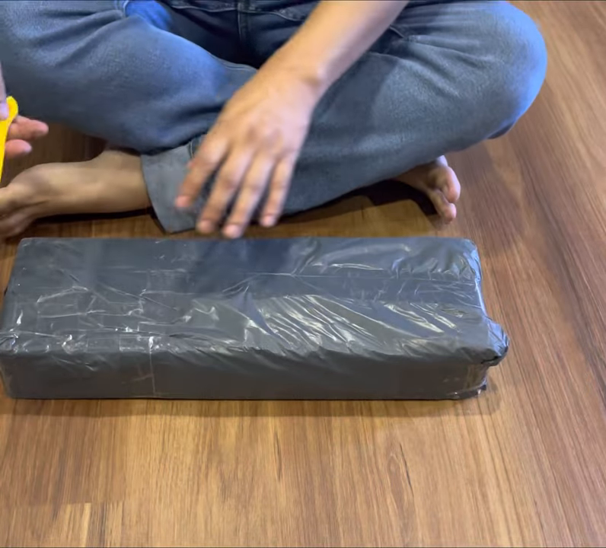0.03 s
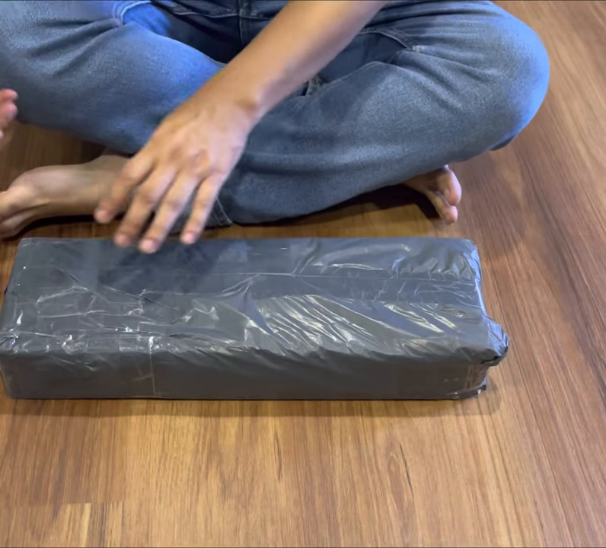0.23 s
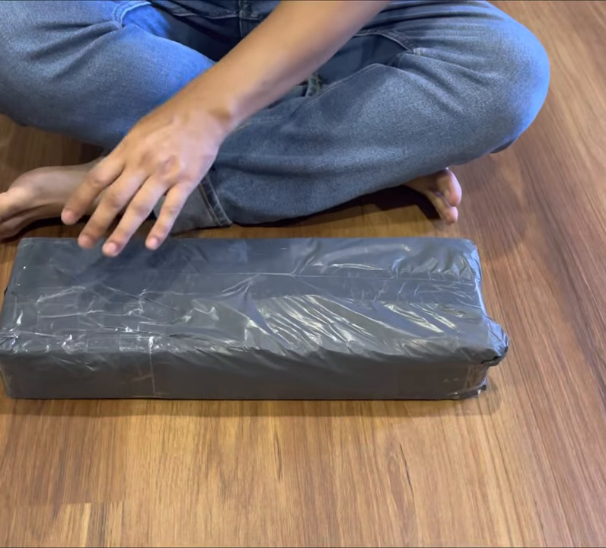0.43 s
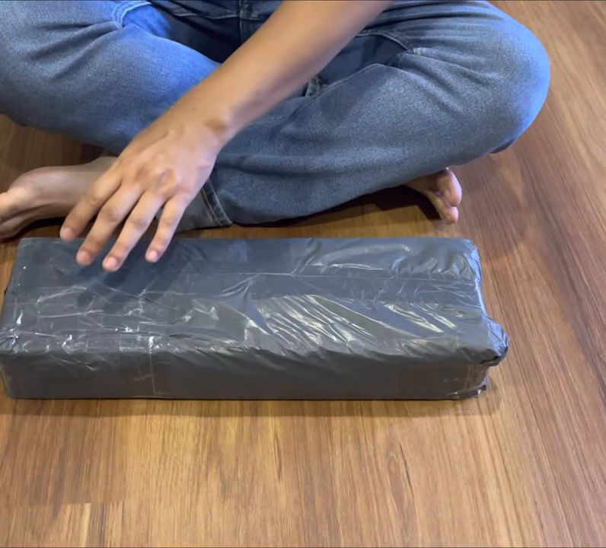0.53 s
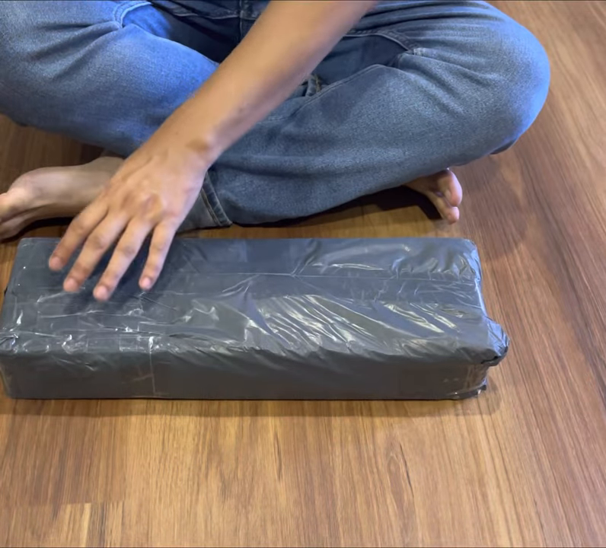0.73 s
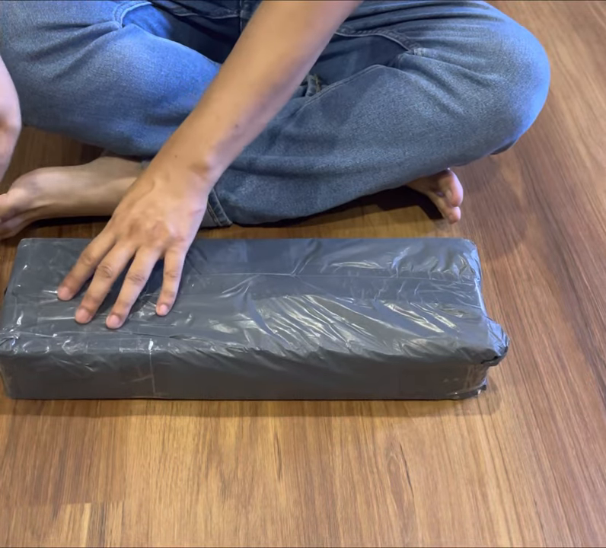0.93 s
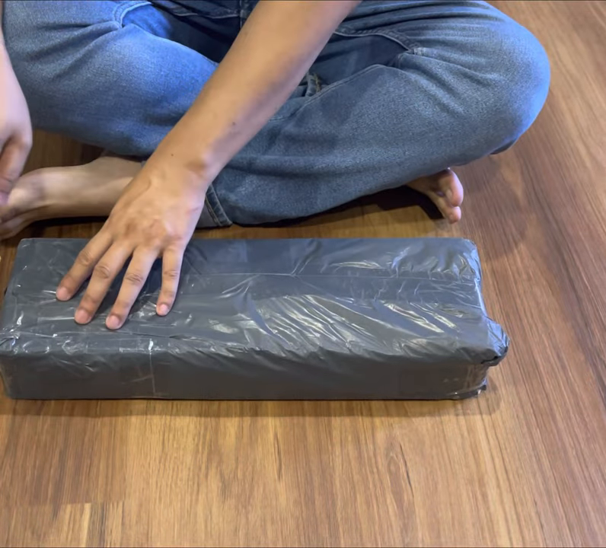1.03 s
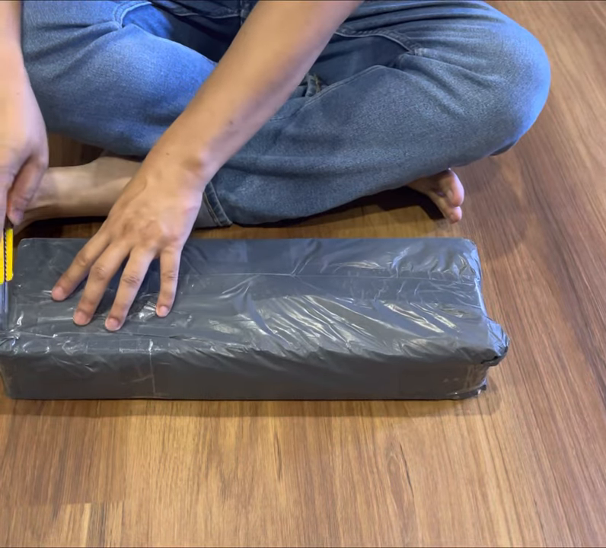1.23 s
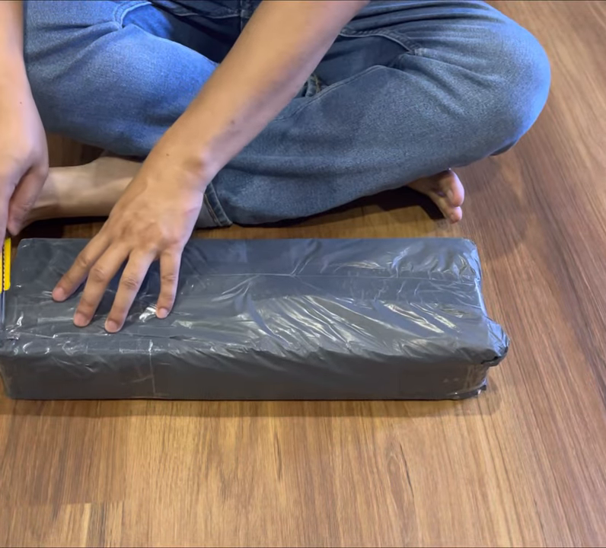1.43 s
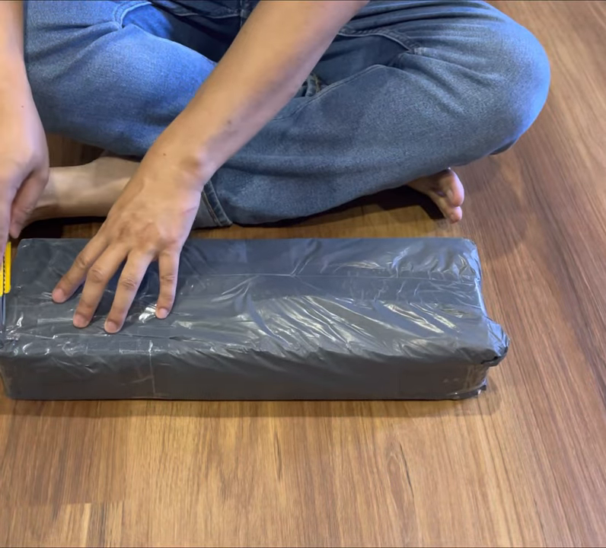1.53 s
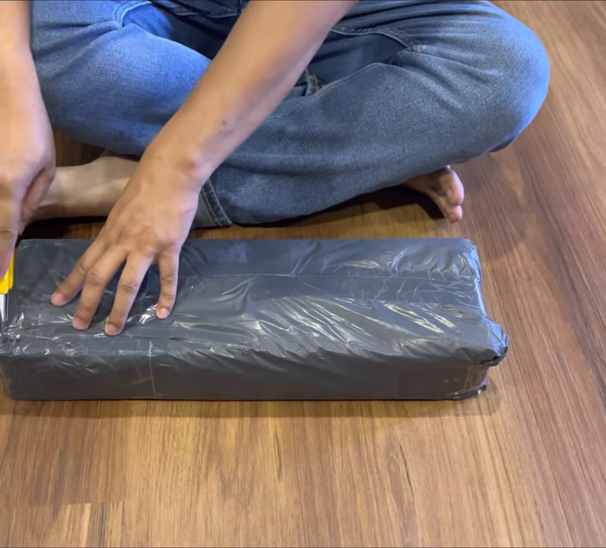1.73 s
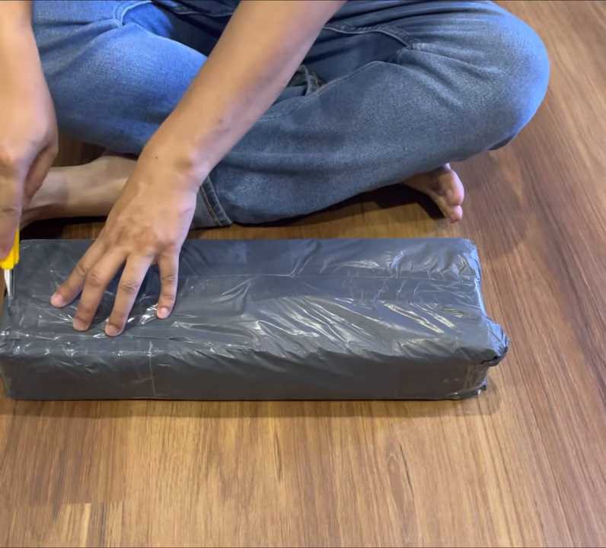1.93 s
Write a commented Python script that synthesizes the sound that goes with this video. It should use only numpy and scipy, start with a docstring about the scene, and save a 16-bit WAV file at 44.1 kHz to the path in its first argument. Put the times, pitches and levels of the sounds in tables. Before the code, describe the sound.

Sharp ratcheting clicks of a utility knife extending, then light taps and cutting on plastic wrap.

```python
"""A utility knife ratchets open: the slider snaps over notches, six sharp clicks and three light ones.
The loose blade tinks, the tip taps a parcel's plastic wrap, then cuts: tiny tears and bigger catches
shake the cardboard box. An appliance hums throughout in the small, hard-floored room.
The right channel lags in phase across the treble."""
import sys
import numpy as np
from scipy import signal
from scipy.fft import rfft, irfft, next_fast_len
from scipy.io import wavfile

SR = 44100
rng = np.random.default_rng(int(sys.argv[2]) if len(sys.argv) > 2 else 0)


def transcribe(signal):
    """Save signal, clipped to [-1, 1], as a 16-bit WAV file at the path in sys.argv[1]."""
    frames = np.atleast_2d(signal).T
    limited = np.clip(frames, -1, 1)
    pcm = np.round(limited * 32767).astype(np.int16)
    wavfile.write(sys.argv[1], SR, pcm)


N = 88200
TIME_S = np.arange(N) / SR
HIT_TIME_S = TIME_S[:4096]
SNAP_ATTACK_S, WRAP_ATTACK_S = 0.00013, 0.00031

# left-right difference of the reflections: freq_hz, level_db
SIDE_SPECTRUM = [(60, -35), (200, -14), (400, -6), (800, 1.5), (1400, -3), (2000, -14), (2900, 2.5),
                 (4500, 1), (6000, -11), (7500, -4.5), (9000, -17), (11000, 3), (13000, -24.5)]


def from_db(db):
    """Decibels to gain."""
    return 10 ** (np.asarray(db) / 20)


def unit_energy(x):
    """Scale to energy 1."""
    return x / np.sqrt(np.sum(x ** 2) + 1e-20)


def unit_rms(x):
    """Scale to rms 1."""
    return unit_energy(x) * np.sqrt(x.size)


def colour(x, spectrum, tilt_db_per_oct=0):
    """Minimum-phase filter with the given spectrum and tilt."""
    size = next_fast_len(2 * len(x), True) // 2 * 2
    hz, db = np.transpose(spectrum)
    octave = np.log2(np.maximum(np.fft.rfftfreq(size, 1 / SR), hz[0]))
    gain_db = np.interp(octave, np.log2(hz), db) + tilt_db_per_oct * (octave - octave.mean())
    cepstrum = irfft(np.log(from_db(gain_db)))
    cepstrum[1:size // 2] *= 2  # fold onto the causal half
    cepstrum[size // 2 + 1:] = 0
    return irfft(rfft(x, size) * np.exp(rfft(cepstrum)))[:len(x)]


def decay(time_s, t60_s):
    """Exponential fall, 60 dB in t60_s."""
    return np.exp(-np.log(1000) * time_s / t60_s)


def envelope(attack_s, t60_s, hold_s=0):
    """Attack, hold and decay of one hit."""
    rise = np.minimum(HIT_TIME_S / attack_s, 1)
    return rise * decay(np.maximum(HIT_TIME_S - attack_s - hold_s, 0), t60_s)


def burst(spectrum, shape, tilt_db_per_oct=0):
    """Rough contact: a short crack of coloured noise."""
    return unit_energy(colour(shape * rng.standard_normal(len(shape)), spectrum, tilt_db_per_oct))


def ring(hz, t60_s):
    """One struck mode, building up during contact."""
    tone = np.sin(2 * np.pi * (hz * HIT_TIME_S + rng.random()))
    return unit_energy(envelope(SNAP_ATTACK_S, t60_s) * tone)


def body(modes, spread_db):
    """An object's modes, with new strengths on each blow."""
    return sum(from_db(db + spread_db * rng.standard_normal()) * ring(hz, t60_s)
               for hz, db, t60_s in modes)


def add(track, start_s, sound):
    """Mix a sound in at start_s."""
    start = int(start_s * SR)
    track[start:start + len(sound)] += sound[:max(N - start, 0)]


def stereo(mid, side, side_db):
    """Mid and side to left and right."""
    return mid + from_db(side_db) * side * np.array([[1], [-1]])


def appliance():
    """Wavering hum lines over a soft rush of air."""
    # air rush: freq_hz, level_db
    air_spectrum = [(20, -13.5), (45, 7.5), (75, 4.5), (150, -3), (300, -6.5), (500, -11.5), (1000, -20),
                    (2000, -25.5), (4000, -36.5), (8000, -49.5), (12000, -58), (15000, -67)]
    # hum lines: pitch_hz, rms_db, waver_depth
    hum_lines = [(48.25, -44, .1), (103.4, -52, 0.57), (161.3, -62.5, 0.47), (247.7, -54, 0.11),
                 (301.2, -66, .4)]
    air_db, waver_knots_per_s = -49.5, 11.4
    mid, side = [unit_rms(colour(rng.standard_normal(N), air_spectrum)) for _ in range(2)]
    out = from_db(air_db) * stereo(mid, colour(side, SIDE_SPECTRUM), side_db=-3.5)
    for pitch_hz, rms_db, waver_depth in hum_lines:
        knots = rng.standard_normal((2, 64))
        swell, slip = [np.interp(TIME_S * waver_knots_per_s, np.arange(len(k)), k) for k in knots]
        tone = np.sqrt(2) * np.sin(2 * np.pi * pitch_hz * TIME_S + waver_depth * slip)
        out += from_db(rms_db) * (1 + waver_depth * swell) * tone
    return out


def ratchet():
    """Each notch cracks and briefly rings blade and body; a dull low thump comes with each loud click."""
    # slider snaps: start_s, level_db, tilt_db_per_oct, low_hz, low_db, main_hz, main_db,
    # upper_hz, upper_db, thump_db
    notches = [(0.1726, -23, -1.5, 2330, -6, 5600, -14, 11600, -23, -13.5),
               (.2092, 0, 3.5, 8440, -1.5, 5900, 3, 11800, -0.5, -9),
               (0.2435, 0, 0, 3840, -5.5, 6510, -2, 12060, 1, 0.5),
               (0.2816, 0.5, 1, 4500, -6.5, 5200, -2, 10460, -8, -10.5),
               (.3280, 1, -1.5, 2890, -17, 6030, 7, 12060, 3, -9),
               (0.4967, -16, 0.5, 2300, -6, 6070, -2.5, 11400, -6, -5),
               (.5160, 2, 1, 5330, 0.5, 6190, 1.5, 11530, 4, 0.5),
               (0.5625, 0.5, -1.5, 3516, -10.5, 6140, 3.5, 11500, 0.5, -4.5),
               (0.7565, -15, -3, 2380, -7.5, 5830, 0.5, 11600, -28, -28)]
    # knife body: freq_hz, level_db, t60_s
    knife_modes = [(2306, -20.5, 0.014), (2880, -25.5, 0.02), (4086, -16, .005), (5055, -13.5, 0.0036),
                   (5720, -13, 0.0052), (6790, -7, 0.0038)]
    # slider crack: freq_hz, level_db
    crack_spectrum = [(300, -19.5), (700, -16.5), (1300, -13), (3300, -8.5), (4200, 1.5), (6000, 9),
                      (7600, -3), (9500, 7), (12300, 5.5), (13300, -10), (15400, -20.5), (16200, -30.5),
                      (18000, -48)]
    # low thump: freq_hz, level_db
    thump_spectrum = [(50, -38), (130, -1), (280, 1.5), (450, -6), (750, -19), (2000, -34.5)]
    snap_gain_db, ring_gain_db, thump_gain_db = 9.5, -4.5, -9
    blade_t60_s, upper_t60_s, thump_delay_s = 0.0098, 0.003, 0.0022
    crack_shape = envelope(SNAP_ATTACK_S, t60_s=0.014, hold_s=0.00049)
    thump = unit_energy(colour(signal.unit_impulse(len(HIT_TIME_S)), thump_spectrum))
    out = np.zeros(N)
    for (start_s, level_db, tilt_db_per_oct, low_hz, low_db, main_hz, main_db,
         upper_hz, upper_db, thump_db) in notches:
        crack = burst(crack_spectrum, crack_shape, tilt_db_per_oct)
        blade_modes = [(low_hz, low_db, blade_t60_s), (main_hz, main_db, blade_t60_s),
                       (upper_hz, upper_db, upper_t60_s)]
        ringing = from_db(ring_gain_db) * body(blade_modes + knife_modes, spread_db=0.5)
        add(out, start_s, from_db(level_db + snap_gain_db) * unit_energy(crack + ringing))
        add(out, start_s + thump_delay_s, from_db(level_db + thump_gain_db + thump_db) * thump)
    return out


def blade_tinks():
    """The loose blade rings, one mode per tink."""
    # blade rings: start_s, pitch_hz, level_db
    tinks = [(.541, 2340, -17), (.732, 2270, -25), (1.393, 3440, -33), (1.465, 4470, -21.5),
             (1.466, 3440, -30), (1.467, 6240, -26)]
    out = np.zeros(N)
    for start_s, pitch_hz, level_db in tinks:
        add(out, start_s, from_db(level_db) * ring(pitch_hz, t60_s=0.017))
    return out


def wrap_taps():
    """Knife tip and fingers tick on the plastic wrap."""
    # touches: start_s, level_db, tilt_db_per_oct
    touches = [(0.853, -24.5, 1.5), (0.9155, -26, -0.5), (1.025, -35, -3.5), (1.172, -43, 4),
               (1.2538, -42, 4.5), (1.259, -39, 0.5), (1.394, -29, 3.5), (1.423, -29.5, -0.5),
               (1.4648, -20.5, 5.5), (1.4840, -21, 0.1), (1.569, -36, 1), (1.625, -36.5, -1),
               (1.6487, -32.5, 0), (1.671, -30, 4), (1.711, -34, 1), (1.729, -34, -2), (1.7873, -35, 14),
               (1.7955, -19, 13)]
    # wrap tick: freq_hz, level_db
    tick_spectrum = [(300, 3.5), (1100, 10.5), (2200, 7.5), (3600, 7), (6200, 6), (8000, 0.5), (11500, 2.5),
                     (13500, -20), (15000, -28), (17000, -53)]
    tick_shape = envelope(WRAP_ATTACK_S, t60_s=0.011)
    out = np.zeros(N)
    for start_s, level_db, tilt_db_per_oct in touches:
        add(out, start_s, from_db(level_db) * burst(tick_spectrum, tick_shape, tilt_db_per_oct))
    return out


def grains(rate_per_s=5000, spread_db=3.5):
    """Tiny tears: random impulses of uneven size."""
    sizes = from_db(spread_db * np.minimum(rng.exponential(1, N), 4))
    signs = rng.choice([-1, 1], N)
    return unit_rms(sizes * signs * (rng.random(N) < rate_per_s / SR))


def cutting():
    """Dense tears in the wrap shake the box; bigger catches stand out."""
    # tearing wrap: freq_hz, level_db
    tear_spectrum = [(300, 12), (1000, 1.5), (1450, 1), (2100, 12.5), (3000, 4), (5000, 4), (6300, 7.5),
                     (7600, 2.5), (9500, 6), (11500, 6.5), (13000, -1.5), (14500, -40)]
    # cardboard box: freq_hz, level_db, t60_s
    box_modes = [(556, -1.5, 0.0295), (645, 1, 0.022), (773, -8, .025), (990, -6, 0.031)]
    # faint hiss fading at the start, later rubbing and blade drag on the wrap: time_s, level_db
    level_curve = [(0, -63.5), (.14, -80), (1.1, -90), (1.36, -99), (1.42, -68), (1.52, -69.5), (1.62, -83),
                   (1.70, -64), (1.785, -56.5), (1.81, -47.5), (1.9, -48), (2.0, -49.5)]
    # blade catches: start_s, tear_db, knock_db
    catches = [(1.803, -18, -31), (1.8125, -20.5, -16.5), (1.826, -15, -14.5), (1.861, -21, -13),
               (1.877, -23.5, -12.5), (1.936, -20.5, -16), (1.956, -20, -14.5), (1.975, -20, -14),
               (1.986, -13, -15)]
    box = sum(from_db(db) * signal.fftconvolve(grains(), ring(hz, t60_s))[:N]
              for hz, db, t60_s in box_modes)
    wrap = colour(grains(), tear_spectrum)
    level_db = np.interp(TIME_S, *np.transpose(level_curve))
    out = from_db(level_db) * (unit_rms(wrap) + unit_rms(box))
    for start_s, tear_db, knock_db in catches:
        tear = burst(tear_spectrum, envelope(WRAP_ATTACK_S, t60_s=0.012))
        knock = unit_energy(body(box_modes, spread_db=2))
        add(out, start_s, from_db(tear_db) * tear + from_db(knock_db) * knock)
    return out


def room_tail(gain_db=-8, onset_s=0.006, split_hz=8500):
    """Diffuse reflections; the treble dies sooner."""
    # reverberation: freq_hz, level_db
    tail_spectrum = [(100, -8.5), (400, -12), (800, -10.5), (1400, 2), (3000, 1.5), (4200, 4), (6000, -1.5),
                     (8000, 3), (11500, 5), (13500, -3), (16000, -27)]
    noise = rng.standard_normal(N)
    low = signal.sosfiltfilt(signal.butter(6, split_hz, fs=SR, output="sos"), noise)
    tail = low * decay(TIME_S, t60_s=0.59) + (noise - low) * decay(TIME_S, t60_s=0.44)
    rise = np.minimum(TIME_S / onset_s, 1)
    return from_db(gain_db) * colour(unit_energy(rise * tail), tail_spectrum)


def room(direct, floor_delay_s=0.0022, floor_db=-21.5, early_db=-5.5):
    """Direct sound plus floor bounce, early reflections and diffuse tail."""
    mid, side = room_tail(), room_tail()
    early = decay(HIT_TIME_S, t60_s=0.036) * rng.standard_normal(len(HIT_TIME_S))
    add(side, 0, from_db(early_db) * unit_energy(early))
    add(mid, floor_delay_s, from_db([floor_db]))
    response = stereo(mid, colour(side, SIDE_SPECTRUM), side_db=-5.5)
    return direct + signal.fftconvolve(direct[None], response, axes=1)[:, :N]


def scene():
    """Knife and parcel in the room, over the hum."""
    return room(ratchet() + wrap_taps() + blade_tinks() + cutting()) + appliance()


def record(dry):
    """Right-channel treble lag, soft clip, steep low-pass."""
    # right-channel phase: freq_hz, lag_rad
    lag_curve = [(20, 0), (2000, 0), (2900, .5), (4000, .8), (4550, 1.5), (5250, 5), (5800, 6.2),
                 (8000, 8.6), (10000, 10.1), (12100, 12.3), (13000, 12.57)]
    ceiling, stopband_hz = 1.3, 17000
    lag_rad = np.interp(np.fft.rfftfreq(2 * N, 1 / SR), *np.transpose(lag_curve))
    right = irfft(rfft(dry[1], 2 * N) * np.exp(-1j * lag_rad))[:N]
    rounded = ceiling * np.tanh(np.array([dry[0], right]) / ceiling)
    return signal.sosfilt(signal.cheby2(12, 60, stopband_hz, fs=SR, output="sos"), rounded)


dry = scene()
out = record(dry)
transcribe(out)
```